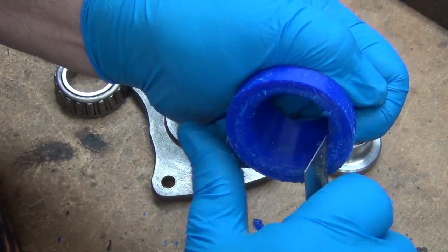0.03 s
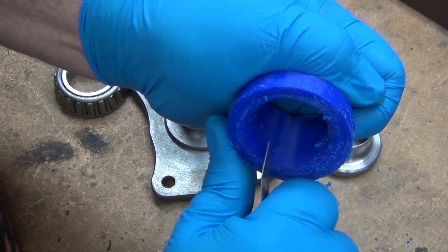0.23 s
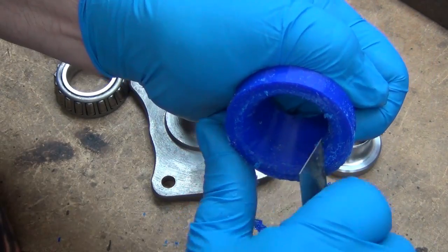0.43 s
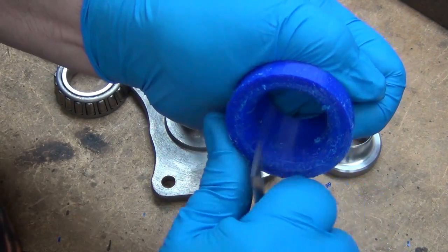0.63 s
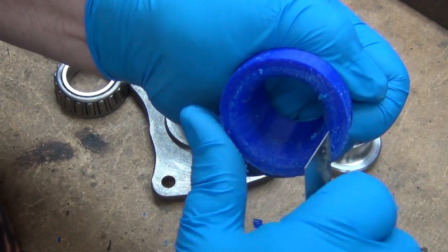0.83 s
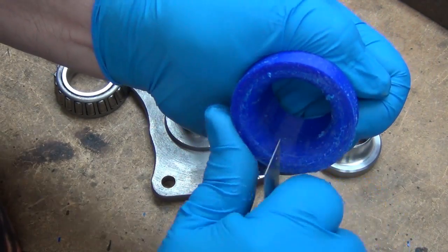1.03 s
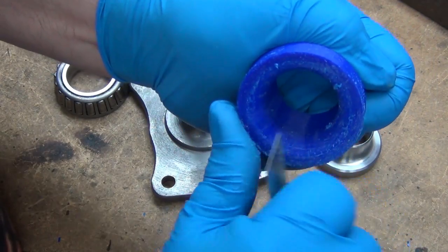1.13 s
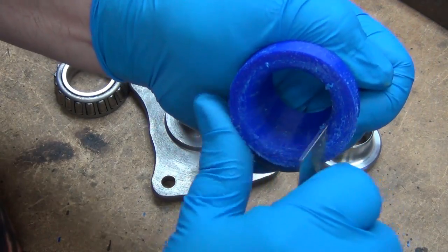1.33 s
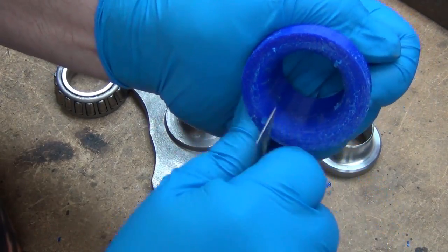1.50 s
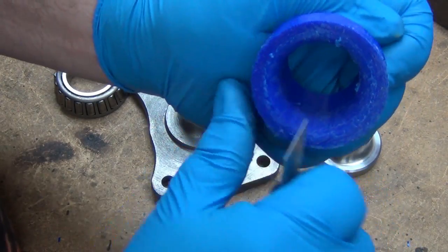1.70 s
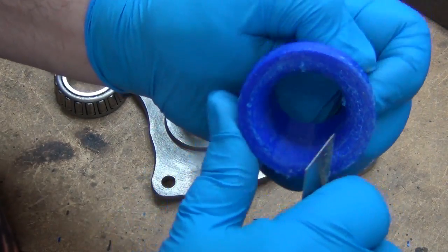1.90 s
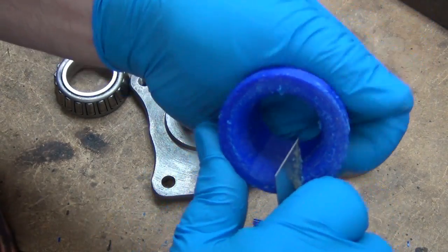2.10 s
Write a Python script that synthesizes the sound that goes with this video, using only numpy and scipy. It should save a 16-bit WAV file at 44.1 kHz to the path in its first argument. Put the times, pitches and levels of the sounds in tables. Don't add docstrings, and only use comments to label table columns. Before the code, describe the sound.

A razor blade scrapes a small plastic cup, heard close in a small room with low fan hum. A sharp tap comes at 0.1 s, then gritty, bright, hollow-ringing strokes at 0.2-0.37, 0.6-0.75 and 1.0-1.15 s. Rubber fingers rub softly around 1.3-1.5 s under a slower fourth stroke at 1.4-1.65 s, ending in a faint squeak. Light ticks follow, a sharp click at 1.9 s, then faint catches near 2 s.

```python
import sys
import numpy as np
from scipy import signal
from scipy.fft import rfft, irfft, next_fast_len
from scipy.io import wavfile
from scipy.ndimage import uniform_filter1d, minimum_filter1d, map_coordinates

SR = 44100
rng = np.random.default_rng(int(sys.argv[2]) if len(sys.argv) > 2 else 0)


def master_out(mix):
    frames = np.transpose(np.atleast_2d(mix))
    ceiling = np.clip(frames, -1, 1)
    pcm = np.round(ceiling * 32767).astype(np.int16)
    wavfile.write(sys.argv[1], SR, pcm)


def boost(x):
    u = np.asarray(x, float) / 20
    return 10 ** u


N = 94815

# [t/s, contact length/s, level/dB, cup share/dB, low blade mode/dB]
FIRST_STROKE = [(.207, 0.0056, -4, -7, -5), (0.2125, 0.014, -25, 0, -7), (0.224, 0.0079, -20, 1.5, 0),
                (0.237, 0.0079, -13.5, -0.5, 5), (0.248, 0.0079, -26.5, 0.5, -1),
                (0.261, 0.0084, -29, 6, 14.5), (0.273, 0.004, -15.5, 5.5, 11), (0.28, 0.0022, -10, -6, 9),
                (.286, 0.0097, -16, 4, 7.5), (0.294, 0.0078, -36, 15, -3), (0.3147, 0.011, -16.5, -6, -15),
                (0.33, 0.0038, -12.5, 1, -12), (0.34, 0.0047, -19, -5, 1),
                (0.3595, 0.0079, -12.5, -1.5, -15)]
SECOND_STROKE = [(0.5931, 0.006, -8.5, -16, -23), (0.593, 0.0071, -17, 3, 2), (0.601, 0.0054, -6.5, 0, -13),
                 (0.613, 0.0067, -13.5, 1.5, 5), (0.625, 0.012, -18.5, 0, -2), (0.636, 0.0056, -11, -4, 3),
                 (0.648, 0.0056, -12, 6, -10), (0.656, 0.0044, -22.5, -11, 18.5),
                 (.665, 0.0088, -17.5, 0, 10), (0.675, 0.015, -17, 4, 4), (0.689, 0.0079, -15, 1, -6),
                 (0.7189, 0.0016, -12, -7.5, -9), (0.7233, 0.0039, -18, -1.5, -3),
                 (0.7288, 0.0033, -23, 2, -5), (0.7349, 0.0069, -19, 3, -12),
                 (0.744, 0.0027, -12.5, -5.5, -10)]
THIRD_STROKE = [(0.977, 0.0032, -26, 4, 0), (.995, 0.0069, -15, -0.5, -1), (1.0237, 0.0039, -12, -6, -12),
                (1.03, 0.0058, -30, 6, -6), (1.039, 0.0027, -21, 4, -6), (1.0481, 0.014, -11.5, -1.5, -2),
                (1.059, 0.0046, -19, -4, -8), (1.07, 0.01, -15, 5, 7), (1.0835, 0.0025, -21, -2, -5),
                (1.114, 0.004, -17.5, -4, 1), (1.121, 0.017, -29.5, 5.5, 0), (1.1475, 0.0033, -9.5, -4, -6),
                (1.153, 0.0091, -19.5, 3.5, -5)]
FOURTH_STROKE = [(1.402, 0.011, -29.5, 2.5, -2), (1.443, 0.033, -11, -3, -3.5),
                 (1.472, 0.021, -17.5, -0.5, -2), (1.494, 0.0031, -16, -10, 1), (1.503, 0.02, -13.5, 2, 4),
                 (1.533, 0.021, -18.5, 3, 3), (1.557, 0.015, -26.5, 1.5, 4), (1.571, 0.0049, -29.5, 6, 7),
                 (1.5844, 0.0072, -17, 0.5, -6), (1.6, 0.0076, -19.5, -5, 0), (1.611, 0.0043, -29.5, -1, 3),
                 (1.617, 0.014, -15, -0.5, -15), (1.633, 0.021, -27, 2, -1), (1.661, 0.0048, -27, 3.5, 5),
                 (1.984, 0.018, -37.5, -1, -3), (2.006, 0.0028, -32.5, -9, -6), (2.009, 0.006, -45, 11, -7)]
# [t/s, level/dB]
LIGHT_DRAG = [
    (0.0, -58),
    (0.24, -68),
    (.4, -47),
    (.5, -71),
    (1.3, -61),
    (1.85, -57.5),
    (1.97, -52.5),
    (2.06, -48.5),
    (2.15, -53.5),
]
# [t/s, lowest modes/dB, push into the hand/dB]
RIM_PLACE = [(.2, 2, -2), (.27, 4, -2.5), (.3, -5, -18), (.37, 0, -2), (.6, -3.5, -7.5), (.65, 2, 1),
             (.68, -3.5, -9), (.72, -1, 9), (.74, 0.5, 6.5), (.98, 8.5, 4), (1.04, -0.5, -3.5),
             (1.09, -2.5, 0.5), (1.15, -3.5, 5), (1.45, -0.5, 1), (1.51, 2.5, -4), (1.57, -4.5, -14),
             (1.63, 2.5, 9), (2.0, -1, -6)]
# [t/s, level/dB, brightness/dB, lowest modes/dB, thud/dB]
RIM_TAPS = [(0.0807, -9, -8.5, 4.5, 0), (0.0905, -24, -11, -3, 5), (0.115, -44, 6, -6, -16),
            (0.1881, -21, -2, -9, -12), (0.5344, -20, -10, 4.5, 0.5), (0.9282, -22, -3.5, 8.5, 8.5),
            (1.7674, -45, -10, 0, -6), (1.7874, -38, -12, 0, -9), (1.7984, -49, -8, -5, -6),
            (1.8314, -29, -9, -7.5, -11), (1.8943, -4.5, -3, -15, -7.5), (1.8964, -8.5, -18, -6.5, -6),
            (1.9658, -27, -3, -13, -6)]
# [f/Hz, width/Hz, level/dB]
CUP_MODES = [(2956, 168, 3), (3235, 218, -1.5), (3830, 310, -4), (4740, 425, -5), (5600, 220, -13)]
# [f/Hz, width/Hz, level/dB]
OVAL_MODES = [(1615, 144, -10.5), (2041, 110, 2.5), (2570, 160, -22.5)]
# [f/Hz, width/Hz, level/dB]
HAND_MODES = [(428, 300, -4), (674, 110, 3.5), (1274, 350, 0)]
# [f/Hz, width/Hz, level/dB]
LOW_BLADE_MODE = [(6176, 304, 0)]
# [f/Hz, width/Hz, level/dB]
BLADE_MODES = [(6915, 380, -9), (7594, 435, 1.5), (8100, 438, 0), (8690, 540, -1.5), (9285, 637, -8)]
# [f/Hz, level/dB]
RASP_COLOUR = [(300, -28), (800, -21.5), (1500, -22), (5000, -11.5), (8000, -0.5), (11000, -8.5),
               (16000, -25.5)]
# [multiple of its pitch, level/dB]
SQUEAK_PARTIALS = [(1, -36), (2, -44.5), (3, -38), (4, -45)]
# [t/s, level/dB]
GLOVE_LEVEL = [
    (1.2, -79),
    (1.28, -54.5),
    (1.4, -48),
    (1.6, -74),
    (1.75, -69),
]
# [f/Hz, level/dB]
GLOVE_COLOUR = [(120, -38), (200, -10), (563, -14.5), (626, -14), (887, -15.5), (1350, -6), (2500, -22),
                (3250, -62), (5500, -120)]
# [t/s, f/Hz]
RUB_PITCH = [
    (1.24, 1248),
    (1.33, 1386),
    (1.45, 1585),
]
# [f/Hz, t60/s]
ROOM_DECAY = [(500, 0.28), (2000, 0.3), (5000, 0.3), (8000, 0.24), (14000, 0.15)]
# [f/Hz, likeness/1]
ROOM_LIKENESS = [(500, .4), (2000, 1), (6000, 0.25), (9000, 0.91), (14000, 0.68)]
# [f/Hz, level/dB]
PORT_SIDE = [(500, -8), (2500, -20), (5500, -19.5), (7000, -11.5), (9000, -18.5), (14000, -25)]
# [f/Hz, level/dB]
AIR_COLOUR = [(12, -37), (20, -12), (113, -7.5), (825, -11.5), (1120, -7), (1530, -12.5), (6720, -16.5),
              (7950, -27.5), (16000, -24)]
# [f/Hz, width/Hz, level/dB]
FAN_HUM = [(60, 18, -72), (99.6, 9.6, -67.5), (119.5, 11, -71), (897, 53, -64), (1185, 72, -71)]
# [f/Hz, likeness/1]
AIR_LIKENESS = [(30, -0.39), (60, 0.48), (250, 0.83), (600, 0.96), (1200, 0.96), (8000, 0.9)]
# [f/Hz, level/dB]
AIR_BALANCE = [(30, -2), (80, 5.5), (300, 3), (1500, .4)]

RELEASE_S, BITE = 0.0019, 1.17
GRAINS_PER_S, GRAIN_SPREAD_DB, GRAIN_TOP = 4600, 5, 2.88
RASP_DB, CUP_DB, LOW_DB, OVAL_DB, HELD_DB = -7.5, -8, -9, -15.5, -34.5
GRIP_SHIFT = 0.023
TAP_S, TAP_CONTACT_S = 0.00066, 0.00006
TAP_DB, TAP_BLADE_DB, TAP_THUD_DB = -7.5, 7, 5.5
SQUEAK_S, SQUEAK_LENGTH_S, SQUEAK_HZ, SQUEAK_WAVER = 1.6, 0.03, 1770, 0.011
RUB_DB, RUB_WAVER = -9, 0.0383
ROOM_DB, NEAR_DB, NEAR_S = -15, -6, 0.044
AIR_DB = -56.5
LIMIT_DB, HOLD_S, TOP_HZ = -7, 0.0048, 16000


def unit(x):
    return x / np.sqrt(np.mean(x ** 2) + 1e-20)


def along(points, hz):
    f, v = np.transpose(points)
    return np.interp(np.log(hz + 1), np.log(f + 1), v)


def curve(rows):
    s, v = np.transpose(rows)
    return np.interp(np.arange(N) / SR, s, v)


def wobble(rate):
    knots = rng.standard_normal(int(N * rate / SR) + 4)
    return map_coordinates(knots, [np.arange(N) * rate / SR])


def filtered(x, response):
    m = next_fast_len(N + SR // 2)
    spectrum = rfft(x, m) * response(np.fft.rfftfreq(m, 1 / SR))
    return irfft(spectrum, m)[..., :N]


def ring(x, peaks):
    def shape(f):
        return sum((-1) ** k * boost(db) * 1j * f * w / (c * c - f * f + 1j * f * w)
                   for k, (c, w, db) in enumerate(peaks))

    noise_gain = np.sqrt(np.mean(np.abs(shape(np.arange(SR // 2))) ** 2))
    return filtered(x, shape) / noise_gain


def colour(x, points):
    size = 1024
    cepstrum = irfft(np.log(boost(along(points, np.fft.rfftfreq(size, 1 / SR)))), size)
    cepstrum[1:size // 2] *= 2
    cepstrum[size // 2 + 1:] = 0
    kernel = irfft(np.exp(rfft(cepstrum)), size)
    return signal.fftconvolve(x, kernel / np.linalg.norm(kernel))[:N]


def pair(spectrum, alike):
    def mid_side(hz):
        turn = np.arccos(np.clip(along(alike, hz), -1, 1)) / 2
        return spectrum(hz) * [np.cos(turn), np.sin(turn)]

    mid, side = filtered(rng.standard_normal((2, N)), mid_side)
    return unit(np.array([mid + side, mid - side]))


def scrape():
    force, bite = np.zeros((2, 3, N + SR))
    t = np.arange(SR // 10) / SR
    for s, length, db, cup_db, low_db in FIRST_STROKE + SECOND_STROKE + THIRD_STROKE + FOURTH_STROKE:
        gain = boost(db + np.array([[0], [cup_db], [low_db]]))
        here = slice(round(s * SR), round(s * SR) + len(t))
        force[:, here] += gain * boost(-60 * np.maximum(t - length, 0) / RELEASE_S)
        bite[:, here] += gain * BITE * np.exp(-t / 0.0011)
    drag = boost(curve(LIGHT_DRAG) + 2.1 * wobble(39.77)) * boost([[0], [-6], [-6]])
    shaving = (force[:, :N] + drag) * grit()
    blade, cup, low = shaving + bite[:, :N] * np.sign(rng.standard_normal(N))
    s, oval_db, held_db = np.transpose(RIM_PLACE)
    oval = cup * boost(curve(np.c_[s, oval_db]))
    held = cup * boost(curve(np.c_[s, held_db]))
    return body(blade, cup, low, oval, held)


def grit():
    hit = rng.random(N) < GRAINS_PER_S / SR
    size = np.minimum(rng.exponential(size=N), GRAIN_TOP)
    return unit(hit * rng.standard_normal(N) * boost(GRAIN_SPREAD_DB * size + 3.2 * wobble(400)))


def body(blade, cup, low, oval, held):
    steel = ring(blade, BLADE_MODES) + boost(LOW_DB) * ring(low, LOW_BLADE_MODE)
    rasp = boost(RASP_DB) * colour(blade, RASP_COLOUR)
    plastic = boost(CUP_DB) * gripped(cup, CUP_MODES) + boost(OVAL_DB) * gripped(oval, OVAL_MODES)
    return steel + rasp + plastic + boost(HELD_DB) * ring(held, HAND_MODES)


def gripped(x, peaks):
    turn = np.pi / 4 * (1 + np.tanh(wobble(24.86)))
    lower = [(c * (1 - GRIP_SHIFT), w, db) for c, w, db in peaks]
    higher = [(c * (1 + GRIP_SHIFT), w, db) for c, w, db in peaks]
    return ring(x * np.cos(turn), lower) + ring(x * np.sin(turn), higher)


def taps():
    force = np.zeros((4, N + SR))
    t = np.arange(SR // 100) / SR
    blow = unit(t * np.exp(-t / TAP_CONTACT_S)) * boost(-10.5)
    for s, db, bright_db, oval_db, held_db in RIM_TAPS:
        rattle = unit(rng.standard_normal(len(t))) * boost(bright_db + TAP_BLADE_DB - 60 * t / TAP_S)
        knock = blow * boost([[0], [oval_db], [held_db + TAP_THUD_DB]])
        force[:, round(s * SR):][:, :len(t)] += boost(db + TAP_DB) * np.vstack([rattle, knock])
    blade, cup, oval, held = force[:, :N]
    return body(blade, cup, blade, oval, held)


def squeak():
    t = np.arange(N) / SR
    phase = 2 * np.pi * np.cumsum(SQUEAK_HZ * (1 + SQUEAK_WAVER * wobble(150))) / SR
    to_edge = np.minimum(t - SQUEAK_S, SQUEAK_S + SQUEAK_LENGTH_S - t)
    fade = np.clip(to_edge / 0.0022, 0, 1)
    return fade * sum(boost(db + 4 * wobble(250)) * np.sin(k * phase) for k, db in SQUEAK_PARTIALS)


def glove():
    pitch = curve(RUB_PITCH) * (1 + RUB_WAVER * wobble(90))
    rub = boost(RUB_DB + 5 * wobble(60)) * np.sin(2 * np.pi * np.cumsum(pitch) / SR)
    friction = pair(lambda hz: boost(along(GLOVE_COLOUR, hz)), [(1000, 0.69)])
    return boost(curve(GLOVE_LEVEL) + 2.35 * wobble(29.61)) * (rub + friction)


def room(x):
    out = np.zeros((2, N + SR))
    start = 40
    for part in np.array_split(x, 9):
        hz, t, z = signal.stft(rng.standard_normal((2, SR // 2)), SR, nperseg=256)
        turn = np.arccos(np.clip(along(ROOM_LIKENESS, hz), 0, 1))[:, None] / 2
        decay = boost(-60 * t / along(ROOM_DECAY, hz)[:, None])
        mid, side = signal.istft(z * [np.cos(turn), np.sin(turn)] * decay, SR, nperseg=256)[1]
        tail = np.array([mid + side, mid - side])
        size = tail.shape[1]
        near = rng.standard_normal(size) * boost(-60 * np.arange(size) / SR / NEAR_S)
        walls = boost(ROOM_DB) * tail / np.linalg.norm(tail[0])
        bench = boost(NEAR_DB) * near / np.linalg.norm(near)
        wet = signal.fftconvolve(part[None], walls + bench, axes=1)
        out[:, start:][:, :wet.shape[1]] += wet
        start += len(part)
    return out[:, :N]


def air():
    hum = sum(boost(db) * pair(lambda hz: np.exp(-((hz - c) / w) ** 2), AIR_LIKENESS)
              for c, w, db in FAN_HUM)
    noise = boost(AIR_DB) * pair(lambda hz: boost(along(AIR_COLOUR, hz)), AIR_LIKENESS)
    return filtered(noise + hum, lambda hz: boost(along(AIR_BALANCE, hz) * [[.5], [-.5]]))


def scene():
    near = scrape() + taps() + squeak()
    apart = filtered(near, lambda hz: 1j * boost(along(PORT_SIDE, hz))) * [[1], [-1]]
    return near + apart + room(near) + glove() + air()


def low_pass(x):
    return signal.sosfilt(signal.butter(12, 16780, fs=SR, output="sos"), x)


def record(dry):
    span = round(HOLD_S * SR) + 1
    need = np.minimum(1, boost(LIMIT_DB) / (np.abs(dry).max(0) + 1e-9))
    gain = uniform_filter1d(minimum_filter1d(need, span), span // 2 + 1)
    mix = filtered(dry * gain, lambda hz: hz < TOP_HZ)
    return low_pass(mix)


dry = scene()
out = record(dry)
master_out(out)
```